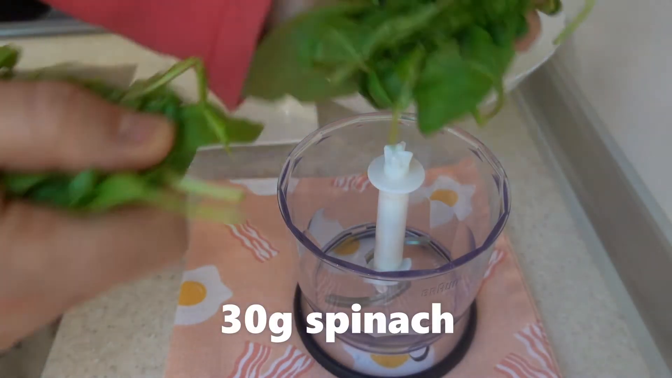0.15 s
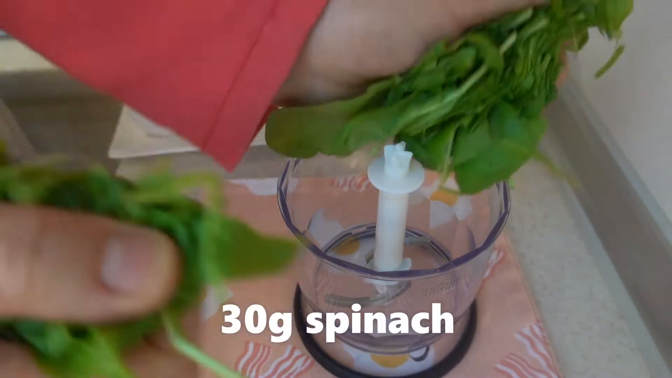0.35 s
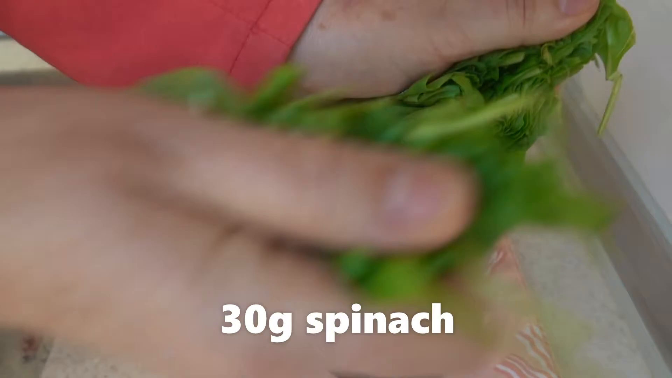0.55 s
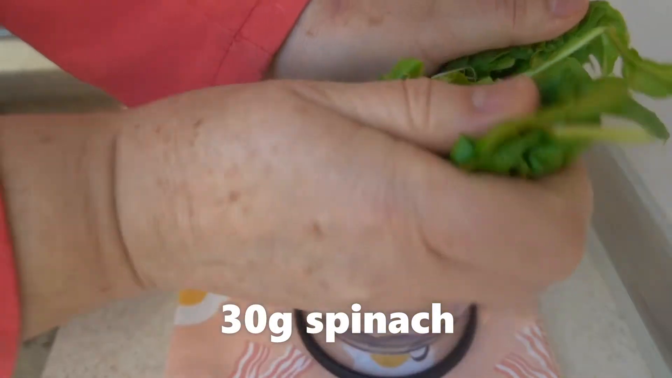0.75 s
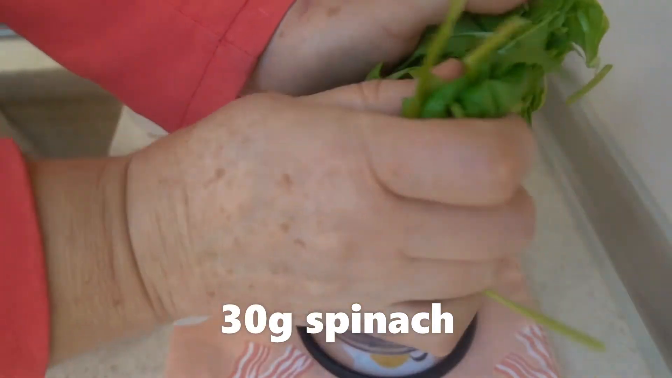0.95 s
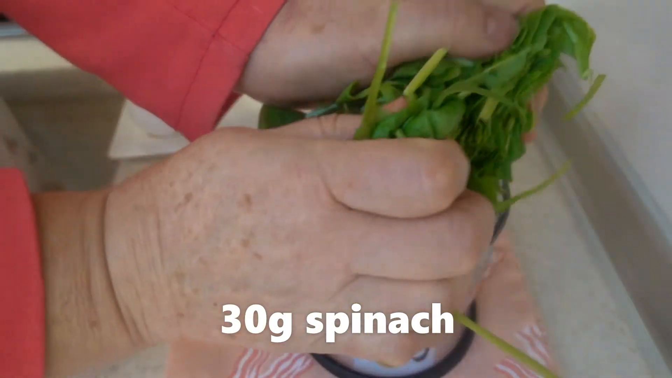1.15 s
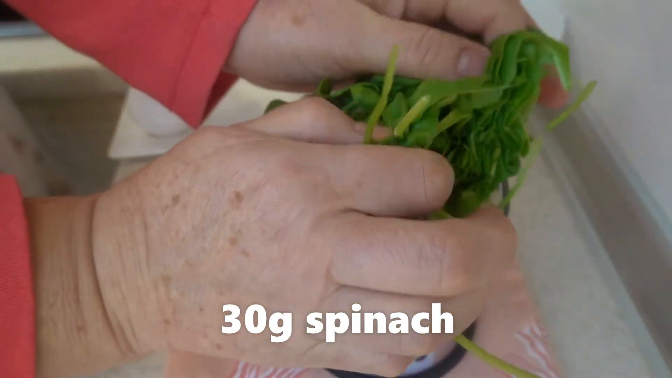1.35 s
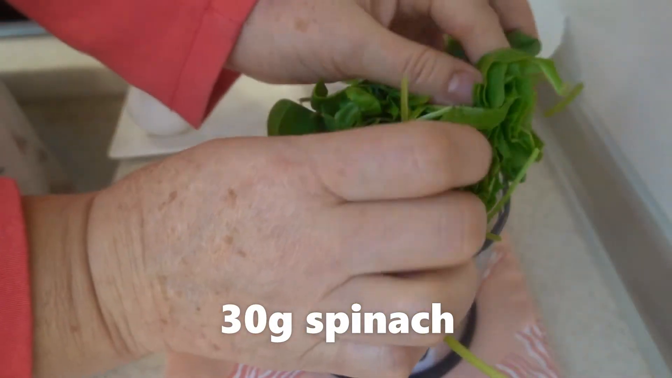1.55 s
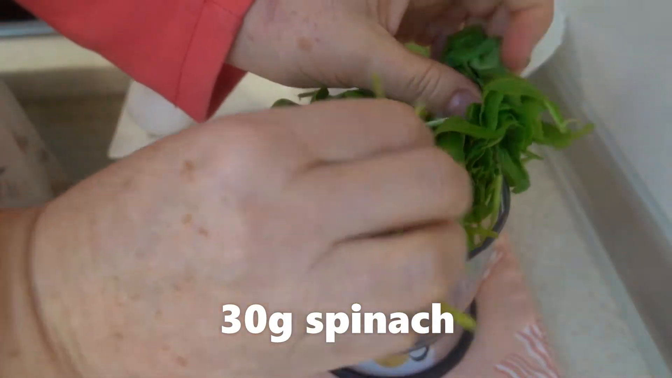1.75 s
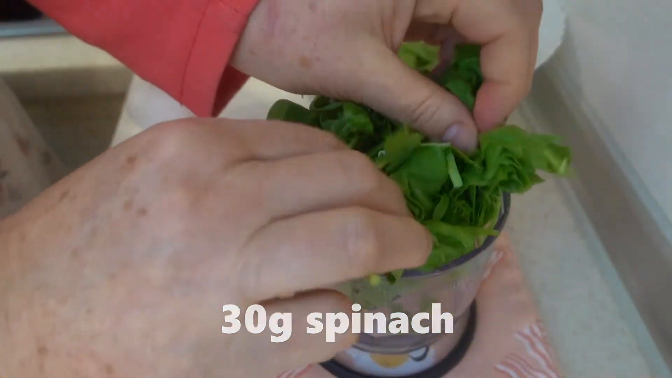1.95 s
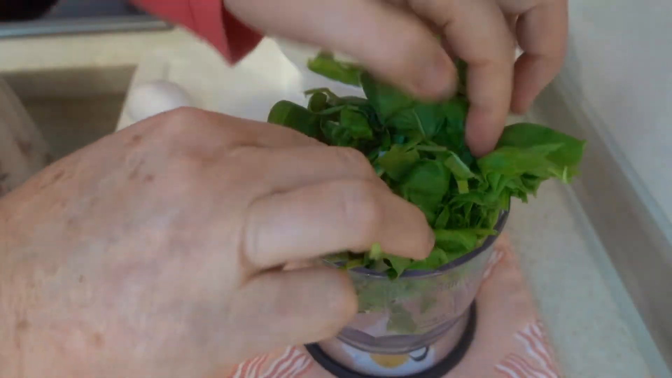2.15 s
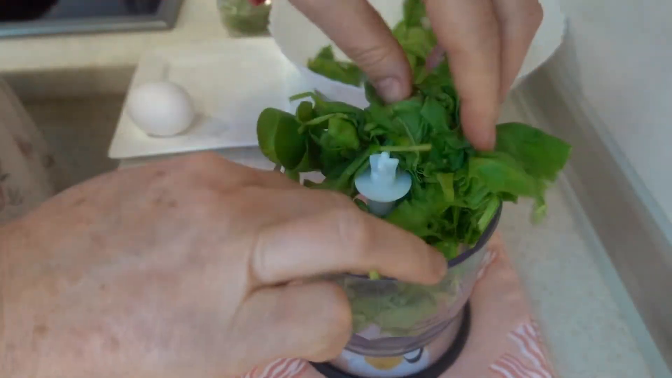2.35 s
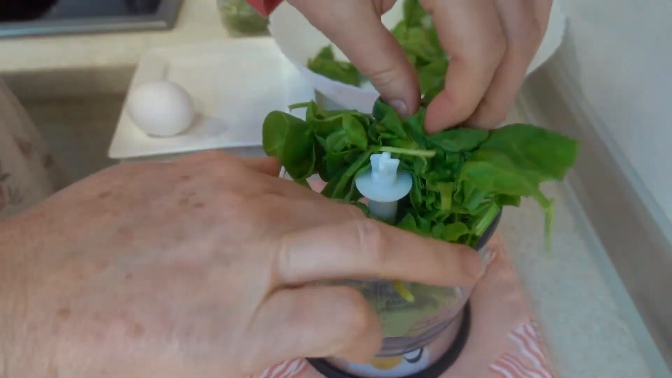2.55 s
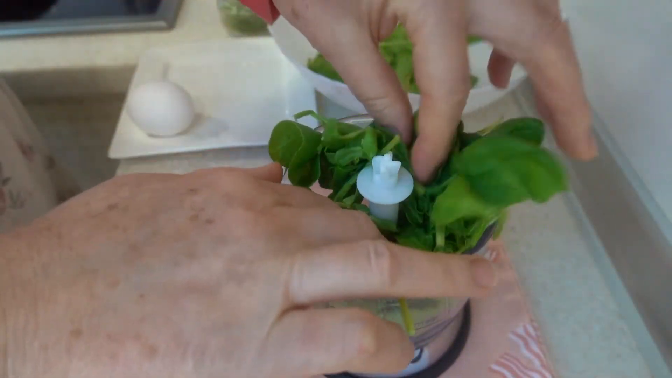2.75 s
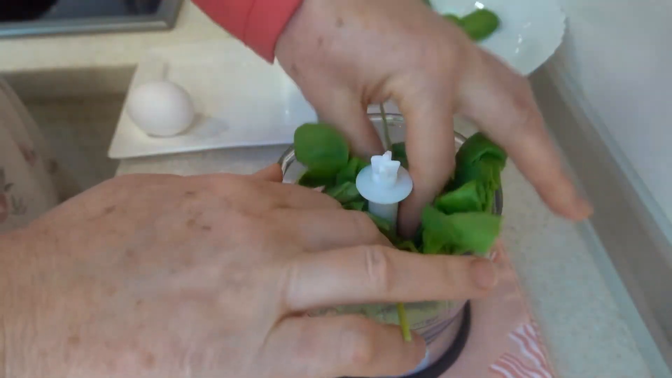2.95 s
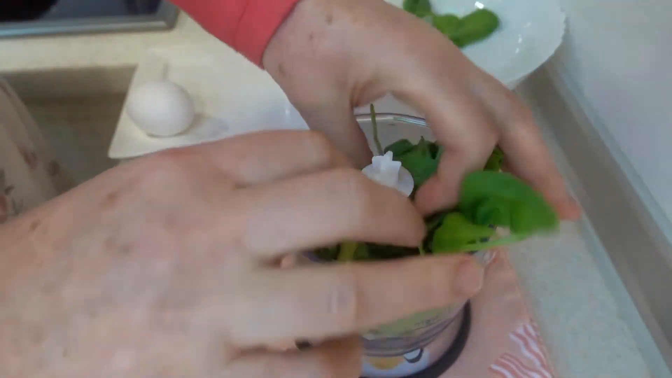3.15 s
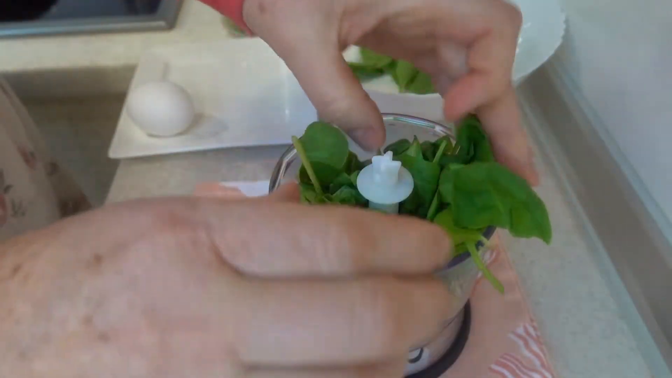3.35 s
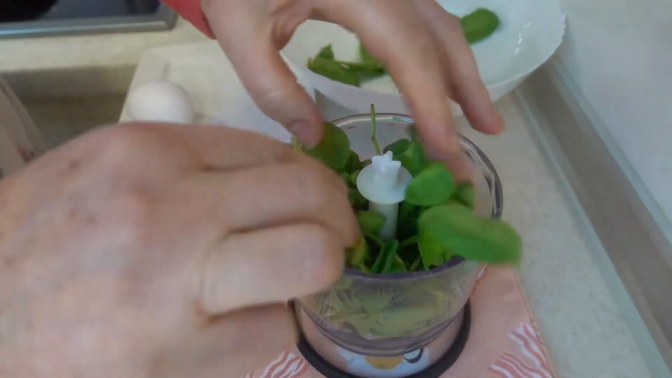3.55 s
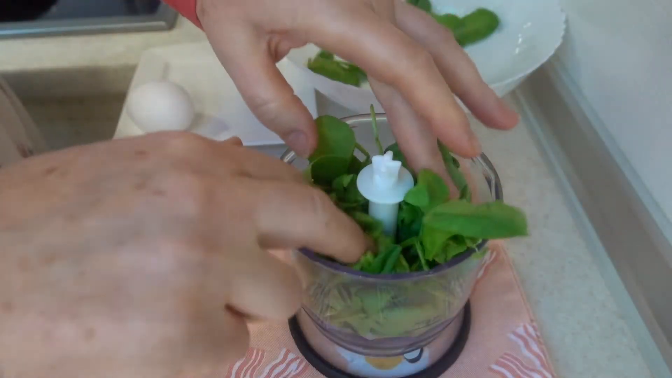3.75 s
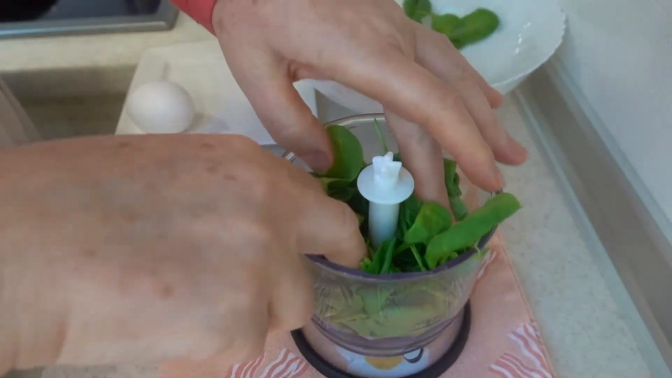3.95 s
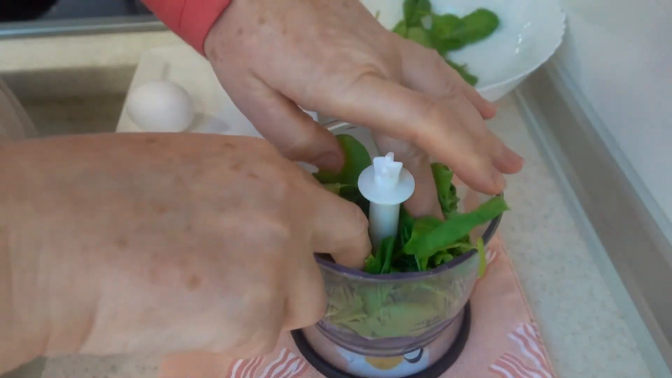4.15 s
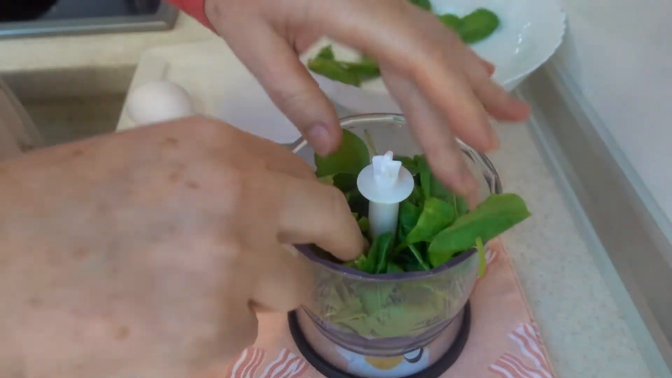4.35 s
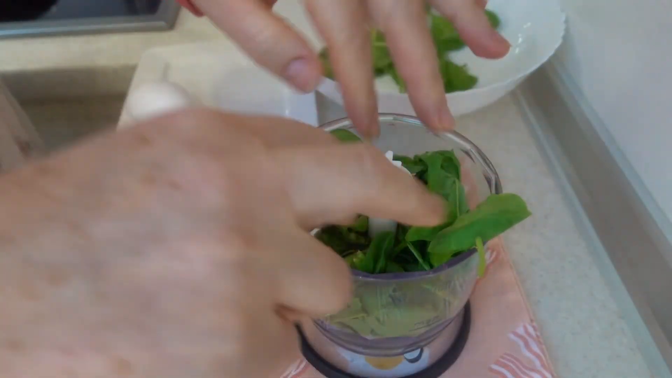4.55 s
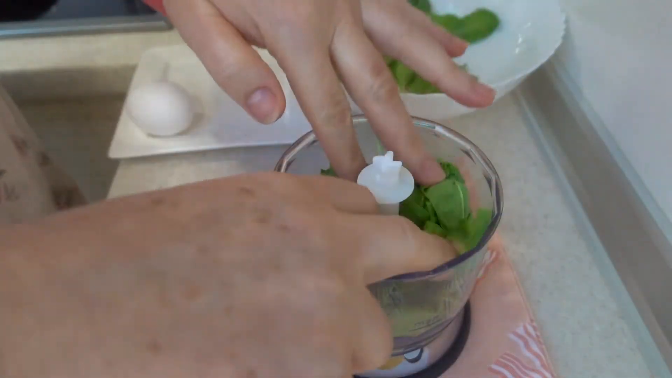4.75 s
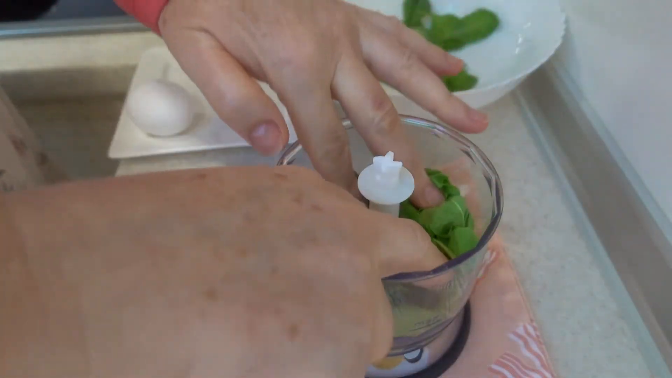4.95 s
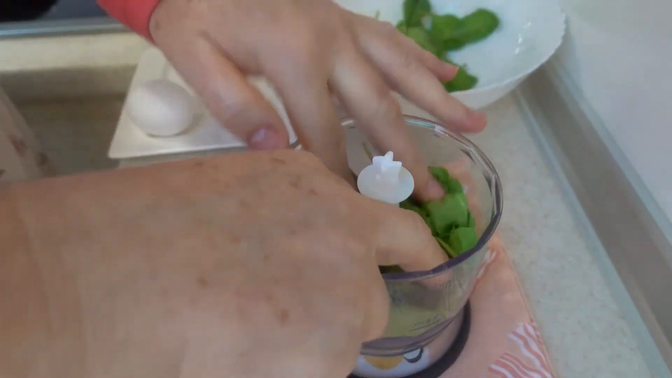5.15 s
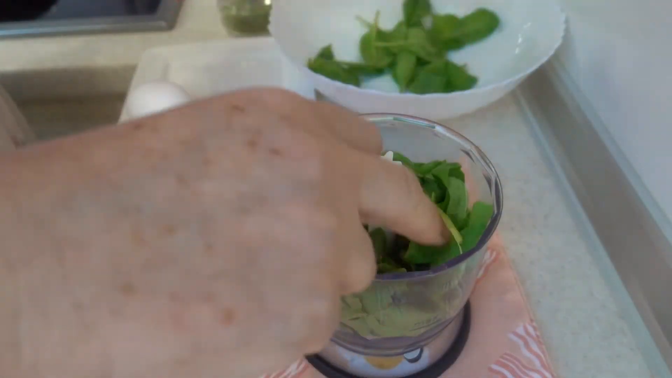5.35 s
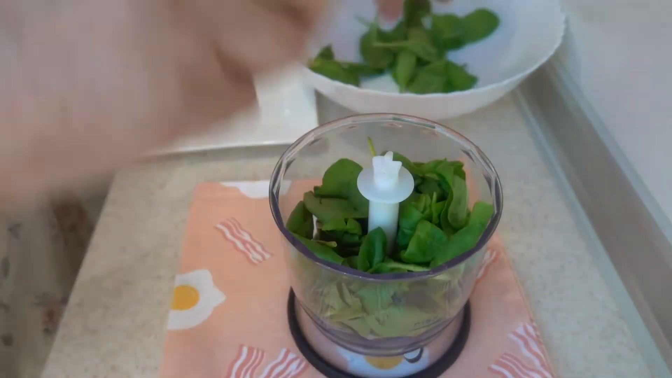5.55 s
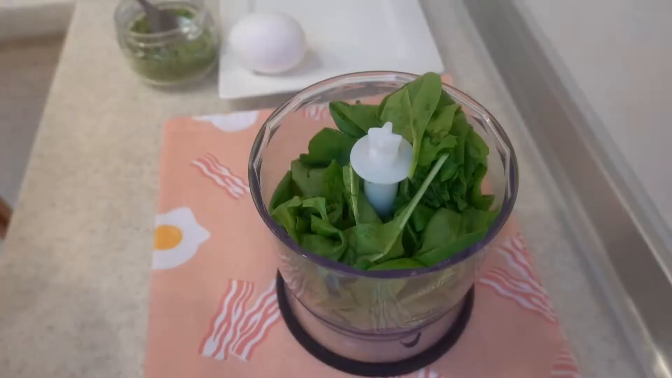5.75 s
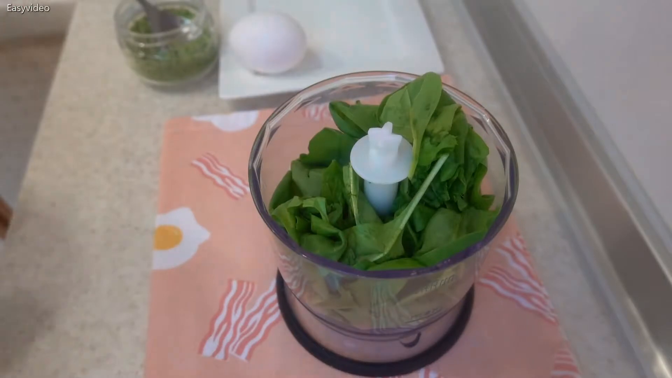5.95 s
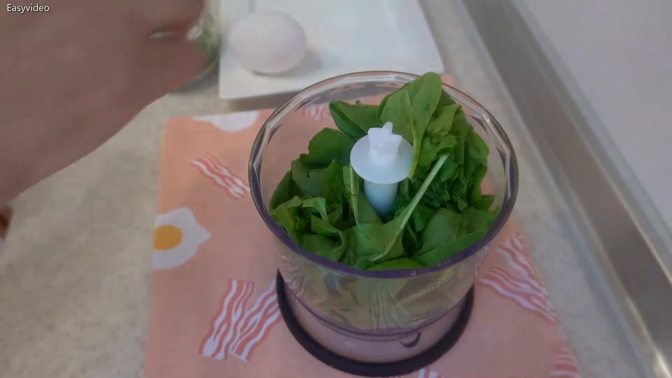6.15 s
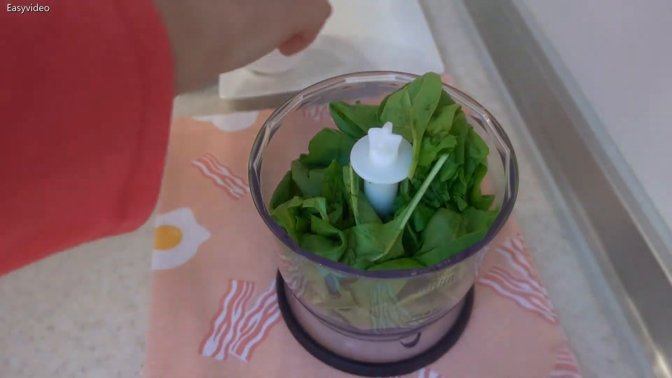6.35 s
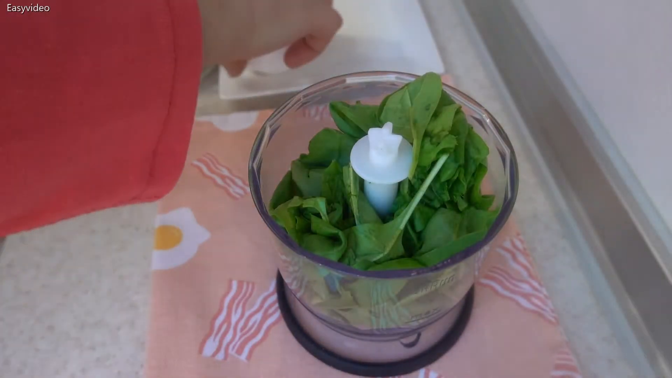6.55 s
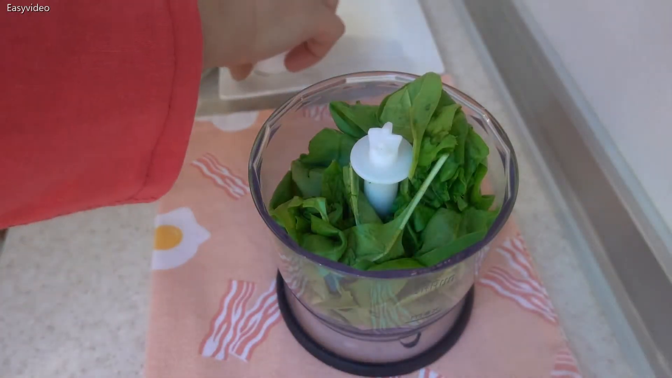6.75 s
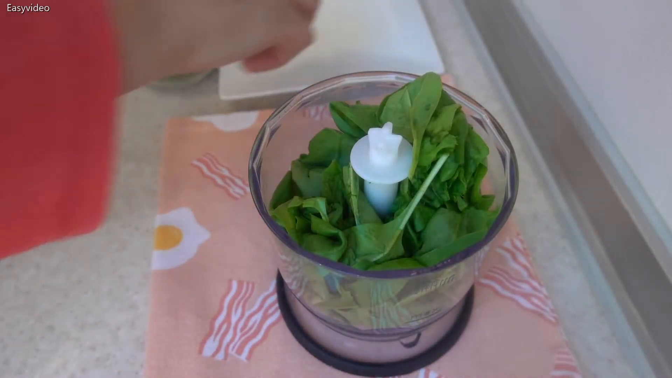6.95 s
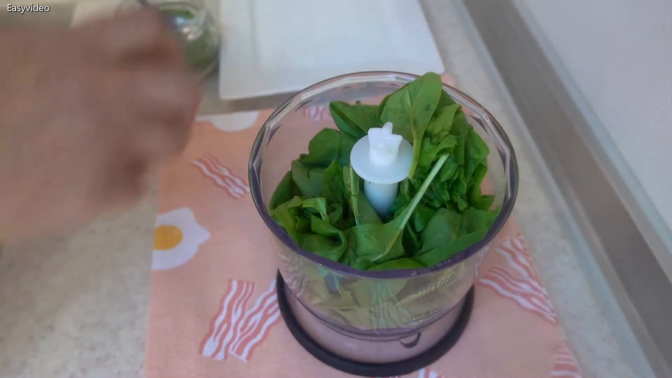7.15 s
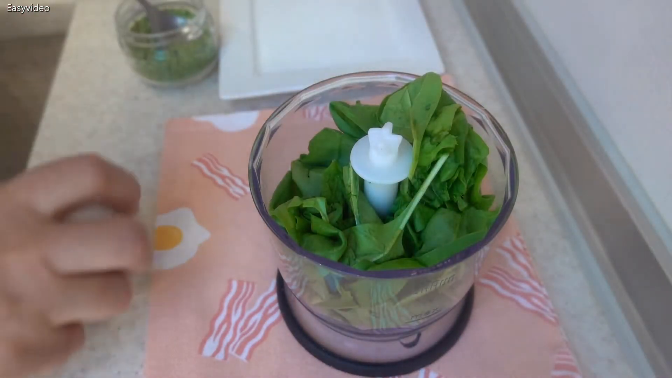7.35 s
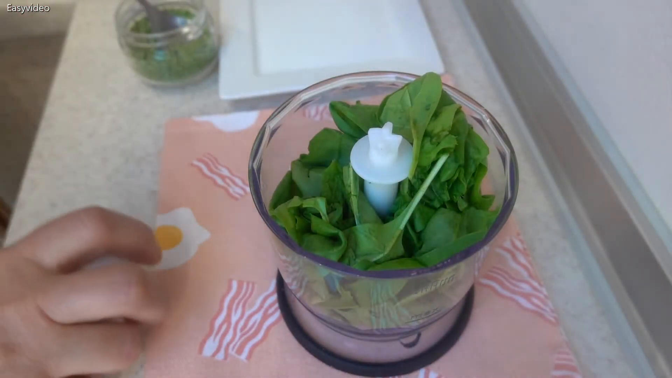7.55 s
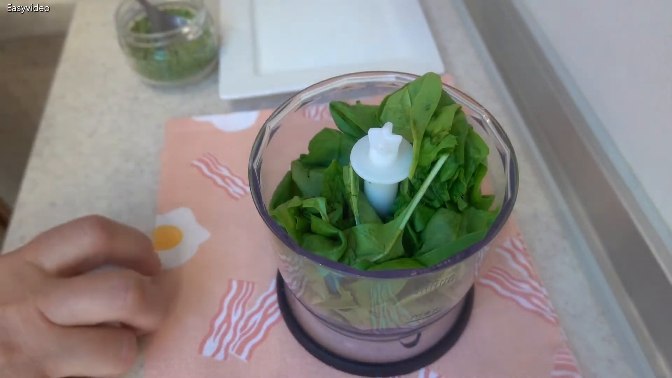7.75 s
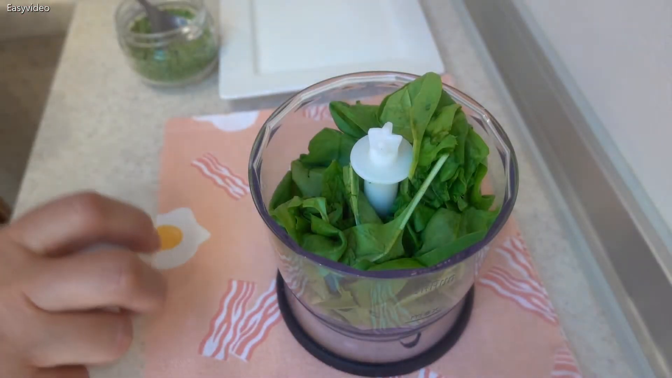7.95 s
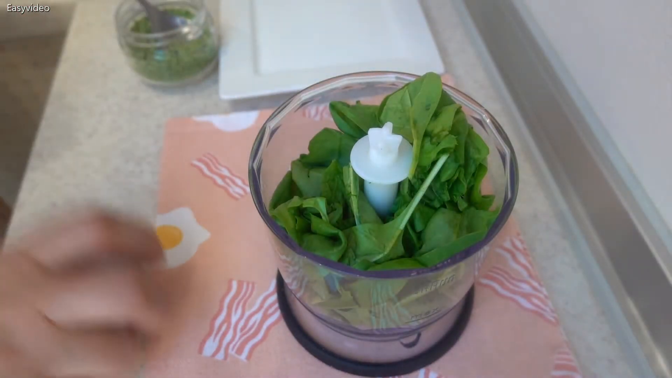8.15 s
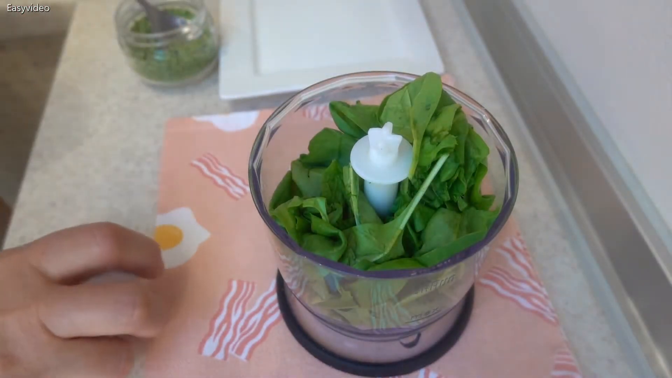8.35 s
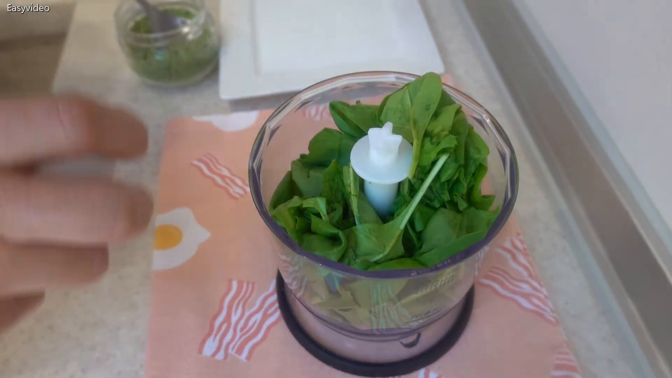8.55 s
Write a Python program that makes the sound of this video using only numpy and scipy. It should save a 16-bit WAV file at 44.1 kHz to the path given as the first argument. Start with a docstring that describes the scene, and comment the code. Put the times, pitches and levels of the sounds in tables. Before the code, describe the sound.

In a quiet kitchen, hands press fresh spinach into a plastic chopper bowl, heard up close. The leaves crinkle and squeak in uneven bursts, stems snap crisply and fingers bump the bowl. The bowl is jolted and a dish rings faintly. After a brief hush a sleeve swishes softly, then an egg is tapped once on the counter and cracked with a thud and a short crunch.

```python
"""Fresh spinach is pressed into the plastic bowl of a chopper on a kitchen counter. The leaves crinkle by many
tiny fractures, stems snap, and wet leaves squeak by stick-slip friction. Finger bumps excite the bowl's modes;
the bowl is jolted and a dish rings. Then the scene changes with a brief dip in level: a sleeve swishes as an
egg is taken from a plate, tapped once on the counter and cracked on it by brittle fracture of the shell. The
kitchen reverberates, and room tone with a faint low drone lies underneath."""
import sys
import numpy as np
from scipy import signal
from scipy.io import wavfile

SR = 44100
rng = np.random.default_rng(int(sys.argv[2]) if len(sys.argv) > 2 else 0)


def store_wav(level_fs):
    """Save 16-bit WAV to argv[1]."""
    pcm = np.round(np.clip(np.atleast_2d(level_fs), -1, 1) * 32767)
    wavfile.write(sys.argv[1], SR, pcm.T.astype(np.int16))


N = 379682
TIME = np.arange(N) / SR
SCENE_CHANGE_S, CRACK_S = 5.78, 8.1425
CUTOFF_HZ = 16200

# Levels are relative: each source applies its own overall gain.
# noise spectra: frequency_hz, density_db
ROOM_SPECTRUM = [(25, -1), (55, -2.5), (110, -1), (170, -5.5), (260, -5), (380, -23), (600, -17),
                 (850, -18.5), (1200, -23.5), (2000, -25.5), (4000, -27.5), (15500, -33)]
CLOTH_SPECTRUM = [(350, -7.5), (520, -12), (760, -9), (1250, -2), (2500, -3.5), (4500, -7.5), (8000, -16),
                  (15500, -13.5)]
CUFF_SPECTRUM = [(1200, -16), (3500, -8.5), (5500, -4), (8000, -2.5), (12000, -8), (15500, -6)]
CRUNCH_SPECTRUM = [(500, -18), (850, -11), (1100, -8.5), (1800, -0.5), (2500, -3.5), (3500, -6),
                   (5000, -9.5), (7500, -9.5), (11000, -17), (15500, -23.5)]
LEAF_SPECTRUM = [(300, -10), (900, -14.5), (1800, -7), (3000, -1), (4500, -2), (7000, -4.5), (11000, -5.5),
                 (15500, -11)]
# likeness of left and right: frequency_hz, correlation
COHERENCE = [(60, 1), (300, 0.91), (600, 0.85), (1200, 0.67), (2500, 0.66), (5000, 0.19), (14000, 0.31)]
# reflections from counter and wall: delay_ms, level_db
NEAR_ECHOES = [(1.12, -5.5), (2.5, -13), (3.7, -12)]
# a faint low drone coming and going: peak_s, length_s, pitch_hz, glide_hz_per_s, level_db
DRONE_SWELLS = [(1.65, 1.5, 174, 19.5, -53), (4.358, 0.86, 169, -6.5, -60.5), (5.601, 1.14, 176, 8, -60),
                (7.949, 0.93, 214.7, -8.5, -59)]

# modes of struck bodies: pitch_hz, level_db, t60_s
PLATE_MODES = [(128, -17, 0.16), (242.2, -4.5, 0.068), (340, -2.5, 0.06), (701, -4.5, 0.11),
               (1040, -13, 0.17), (2030, -8, 0.16), (2710, -6, .06)]
COUNTER_MODES = [(71, -29.5, 0.52), (123.7, -12, 0.23), (154, -24, 0.33), (200, -15, 0.2),
                 (235.7, -14, .19), (273, -16.5, 0.27), (257.7, -15, 0.2), (298, -5, 0.049),
                 (446, -25, 0.35), (726, -16, 0.13), (1290, -16, 0.016), (1900, -16, 0.055)]
DISH_MODES = [(1375, -4.5, 1), (2063, -6.5, 0.77), (2880, -3, 0.64), (3775, 0, 0.15), (4780, -5, .1),
              (7070, -7, 0.11)]
BOWL_MODES = [(128.7, -15.5, 0.2), (201, -18.5, 0.26), (289, -5.5, 0.054), (345, -16, 0.11),
              (399.7, -21.5, 0.11), (495, -13, 0.059), (686, -10, 0.024), (1049, -4, 0.07),
              (1193, -9, 0.049), (1410, -2, 0.027), (1616, 0.5, 0.03), (2144, 2, 0.031), (2900, -9, .03)]
CAVITY_MODES = [(207, -9.5, 0.061), (586, 3.5, 0.089), (620, -16, .12)]
# impacts: start_s, level_db, contact_ms
PLATE_NUDGES = [(6.366, -41.5, 2.9), (6.572, -43.5, 1.3), (6.598, -38.5, 1.6), (6.706, -33, 1.3)]  # the egg nudging its plate
COUNTER_KNOCKS = [(7.5958, -17.5, 1.9), (7.599, -16, 0.97), (7.603, -20.5, 3), (8.144, -22, 3.6),
                  (8.157, -17.5, 3.1), (8.171, -8, 4.05), (8.197, -10, 5.7)]  # egg and hand striking the counter
DISH_CLINKS = [(5.608, -42, 0.17), (5.626, -34, 0.14)]
FINGER_BUMPS = [(1.057, -29, 1.4), (1.841, -29.5, 1.1), (1.885, -24, 2.6), (2.224, -32.5, 0.98),
                (2.292, -27.5, 0.94), (2.483, -29, 1.2), (2.608, -27.5, 1.2), (2.755, -32, 1),
                (2.895, -30.5, .5), (3.856, -25.5, 0.76), (4.040, -33, 0.22), (4.831, -22.5, 0.51),
                (4.932, -31.5, 0.38), (5.577, -24, 2.6), (5.610, -24.5, 0.28), (5.617, -27, 1.3),
                (5.638, -22, 0.38)]
CAVITY_POPS = [(1.889, -23, 1.7), (2.295, -32.5, .6), (2.795, -36.5, 0.59), (2.898, -32.5, 0.75)]  # hollow pops of the bowl
# resonances driven by noise: pitch_hz, width_hz, level_db
NOOK_PEAKS = [(720, 64, 1.5), (1236, 100, -3), (159, 124, -1)]  # the nook between counter and wall
SHELL_PEAKS = [(1694, 40, 6.5), (1770, 60, 3.5), (1900, 110, 1), (2070, 140, -1), (2460, 230, -7.5),
               (1270, 120, -8), (870, 37, -6.5)]  # the breaking eggshell
SHUDDER_PEAKS = [(116, 22, -9), (200, 17, -8.5), (236.6, 21, -5), (273, 20, -3), (446, 45, -15)]  # the counter under the crushed shell
RUBBED_BOWL_PEAKS = [(177, 110, -0.5), (330, 186, -2.5), (660, 118, 3.5), (1048, 52, 1), (1368, 160, -2.5),
                     (1680, 95, -0.5), (2060, 350, 0), (2880, 500, -6), (3605, 160, .5)]
# swells of grainy noise: peak_s, length_s, pitch_hz, width_hz, level_db
RUMBLE = [(.03, .45, 50, 50.5, -53)]  # a soft rumble at the outset
SHELL_CHAFES = [(7.116, 0.067, 5400, 500, -59.5), (7.182, 0.045, 5360, 500, -53),
                (7.265, .03, 5300, 400, -59.5), (7.41, 0.031, 5350, 398, -65),
                (7.456, 0.02, 5240, 400, -67)]  # fingertips on the egg
FOOT_JUDDER = [(5.625, .05, 335, 80, -32.5), (5.64, .06, 240, 40, -38), (5.68, .07, 395, 90, -47)]  # the bowl's foot on the counter
LEAF_SQUEAKS = [(.80, 0.076, 9400, 400, -51), (.87, 0.18, 5430, 300, -49.5), (.90, .14, 6200, 300, -49.5),
                (.94, .14, 3700, 300, -47.5), (.92, .08, 9400, 400, -52), (2.265, 0.072, 2950, 1800, -36.5),
                (4.26, 0.069, 3600, 2500, -45.5), (4.873, .02, 3100, 2200, -35.5),
                (5.123, 0.044, 4240, 3000, -41.5), (5.26, 0.075, 11700, 350, -51)]  # wet leaves sliding

# the arm reaching out and drawing back: peak_s, length_s, sleeve_db, cuff_db
ARM_SWEEPS = [(5.93, 0.18, -58, -76), (6.19, 0.43, -53, -64), (6.953, 0.21, -63, -59.5),
              (7.127, 0.23, -61.5, -57.5), (7.39, 0.39, -78, -63.5)]
# steady rustle of the held leaves: time_s, level_db
GRIP = [(0.0, -45.5), (0.25, -53), (1.37, -42), (1.85, -47), (2.78, -38), (3.01, -40.5), (3.2, -59),
        (3.47, -60.5), (3.88, -44), (4.11, -46), (4.35, -63.5), (4.64, -64.5), (4.81, -47), (5.04, -57),
        (5.26, -64.5), (5.63, -51.5), (5.74, -63)]
# fingers crushing leaves: start_s, hold_s, level_db, tilt_db_per_octave, relative_rubbing_db
PUSHES = [(0.303, 0.043, -40, -2, -28), (0.384, 0.13, -45.5, -2, -7), (0.546, 0.062, -45, -1.5, -6.5),
          (0.728, 0.067, -46, -1, -10), (0.918, 0.037, -42.5, 1, -10), (1.077, 0.036, -37, 0, -10),
          (1.20, .13, -42, -1.5, -13), (1.374, 0.051, -38.5, 3.5, -2.5), (1.78, .06, -45.5, -0.5, -0.5),
          (1.93, 0.074, -42.5, -0.5, -11.5), (2.028, 0.043, -41, 10, -13), (2.204, 0.098, -35.5, 0, -8),
          (2.274, 0.026, -30.5, -3.5, -10), (2.464, .03, -40, 4, -11), (2.55, .08, -38.5, 3, -10),
          (2.739, 0.06, -32, 0, -6), (2.873, 0.078, -38.5, -4, -4.5), (3.087, 0.067, -38, 2.5, -11.5),
          (3.435, 0.019, -43.5, 2.5, -31), (3.518, 0.04, -46.5, 3.5, -13), (3.658, 0.023, -41.5, -2, -6),
          (3.708, 0.068, -41.5, 3, -8), (3.874, 0.13, -45.5, -8, -3.5), (4.024, 0.037, -33.5, -7, -12.5),
          (4.21, 0.064, -42, -2, -7.5), (4.627, 0.1, -47.5, 2, -10.5), (4.846, 0.068, -40, 0.5, -3.5),
          (4.912, 0.064, -40.5, 2, 2), (4.994, 0.0099, -39, 7, -18), (5.092, 0.056, -42, -1, -7),
          (5.165, 0.095, -49.5, 1.5, -5.5), (5.56, 0.26, -49, 2, -8)]
# stems and leaf ribs breaking: start_s, level_db, pitch_hz, tear_ms
STEM_SNAPS = [(0.1055, -22.5, 8550, 5.3), (0.3293, -24.5, 4730, 4.5), (0.411, -25.5, 3600, 5.2),
              (0.5774, -27, 2860, 4), (1.2426, -21, 4840, 4.9), (1.4003, -12, 4420, 3.1),
              (1.498, -21.5, 4650, 4), (1.6774, -24, 3630, 7.1), (1.7885, -17, 3750, 4),
              (2.0348, -21.5, 11000, 3), (2.0564, -22, 12610, 4), (2.1267, -19.5, 11900, 3),
              (2.2942, -14, 9190, 3.6), (2.4501, -14.5, 2530, 4.4), (2.531, -20, 4500, 4),
              (2.5691, -15, 11300, 4.4), (2.644, -6.5, 12200, 3), (2.7696, -13.5, 3560, 4),
              (2.894, -18, 3654, 4.4), (2.9422, -21, 3300, 4.4), (3.5263, -28, 4400, 4.9),
              (3.6726, -23.5, 5130, 4), (3.7215, -14, 3540, 5), (3.7504, -16, 6350, 4),
              (4.041, -18.5, 2880, 3.7), (4.115, -22, 4780, 4), (4.5334, -40, 12400, 4),
              (4.9322, -21.5, 2660, 3.2), (4.9604, -19.5, 5320, 4.1), (5.029, -23, 3670, 4),
              (5.1864, -22, 11300, 4)]


def from_db(db):
    """Amplitude ratio of a level in decibels."""
    return 10 ** (np.asarray(db) / 20)


def rms_one(x):
    """Normalisation to unit mean power."""
    return x / np.sqrt(np.mean(x ** 2) + 1e-20)


def at_hz(points, hz):
    """Interpolation on a logarithmic frequency axis."""
    frequencies, values = np.transpose(points)
    return np.interp(np.log(hz), np.log(frequencies), values)


def drift(rate_hz):
    """Random modulation of unit rms, interpolated between Gaussian draws."""
    knots = rng.standard_normal(int(N / SR * rate_hz) + 2)
    return rms_one(np.interp(TIME * rate_hz, np.arange(len(knots)), knots))


def swell(peak_s, length_s):
    """Gaussian envelope, length_s wide at 1/e of its peak."""
    return np.exp(-np.minimum((2 * (TIME - peak_s) / length_s) ** 2, 50))


def stereo(pair, hz):
    """Partial coherence: two independent signals, as mid and side, are less alike in the treble."""
    alike = np.clip(at_hz(COHERENCE, hz), 0, 1)
    return np.sqrt((1 + alike) / 2) * pair[0] + np.sqrt((1 - alike) / 2) * pair[1] * [[1], [-1]]


def bandpass(x, low_hz, high_hz):
    """Butterworth band-pass filter."""
    return signal.sosfilt(signal.butter(2, [low_hz, high_hz], "band", fs=SR, output="sos"), x)


def resonance(x, hz, width_hz):
    """Damped two-pole oscillator with unit gain at its peak."""
    r = np.exp(-np.pi * width_hz / SR)
    feedback = [1, -2 * r * np.cos(2 * np.pi * hz / SR), r * r]
    return signal.lfilter(np.array([1, 0, -1]) * (1 - r * r) / 2, feedback, x + 1e-18)


def shaped_noise(force, spectrum, flicker_db=0, tilt_db_per_octave=0):
    """Source and filter: force-modulated noise is weighted in half-octave bands."""
    edges = 23 * 2 ** np.arange(0, 9.6, .5)
    drive = rng.standard_normal((2, 2, N)) * force + 1e-18
    out, power = 0, 0
    for k, (low, high) in enumerate(zip(edges, edges[1:])):
        if high < spectrum[0][0]:
            continue
        hz = np.sqrt(low * high)
        octaves = np.log2(np.clip(hz, 2000, 13000) / 5000)
        gain = from_db(at_hz(spectrum, hz) + tilt_db_per_octave * octaves)
        band = bandpass(stereo(drive[k % 2], hz), low, high)
        out += gain * band * (from_db(flicker_db * drift(220)) if flicker_db else 1)
        power += gain ** 2 * (high - low) / (SR / 2)
    return out / np.sqrt(power)


def resonant_noise(force, peaks):
    """Forced vibration: force-modulated noise drives parallel resonances of alternating sign."""
    drive = rng.standard_normal((2, N)) * force
    out, power = 0, 0
    for k, (hz, width, db) in enumerate(peaks):
        out += (-1) ** k * from_db(db) * resonance(stereo(drive, hz), hz, width)
        power += from_db(db) ** 2 * np.pi * width / SR
    return out / np.sqrt(power)


def grains(per_s, spread_db, grain_ms, smooth_share):
    """Shot noise: a force of unit rms, made of tiny random fractures over smooth friction."""
    sizes = from_db(spread_db * np.minimum(rng.exponential(1, N), 3))
    impulses = sizes * (rng.random(N) < per_s / SR)
    decay = np.exp(-2000 / (grain_ms * SR))
    energy = signal.lfilter([1], [1, -decay], impulses ** 2 + 1e-18)
    return np.sqrt((1 - smooth_share) * energy / energy.mean() + smooth_share)


def grainy_swells(rows):
    """Irregular pulses drive one resonance per swell, as in stick-slip friction."""
    out = np.zeros((2, N))
    slips = grains(per_s=900, spread_db=4, grain_ms=0.64, smooth_share=0.45)
    for s, length, hz, width, db in rows:
        near = np.abs(TIME - s) < 2 * length
        drive = stereo(rng.standard_normal((2, near.sum())), hz) * slips[near]
        out[:, near] += from_db(db) * rms_one(resonance(drive, hz, width)) * swell(s, length)[near]
    return out


def struck(impacts, modes):
    """Modal ringing after impact: the longer the contact, the weaker the high modes."""
    force, out = np.zeros(N), np.zeros((2, N))
    for s, db, contact_ms in impacts:
        contact_age = np.arange(SR // 50) / (contact_ms * SR / 1000)
        pulse = contact_age * np.exp(-2 * np.pi * contact_age)
        start = round(s * SR)
        force[start:start + len(pulse)] += from_db(db) * pulse / pulse.sum()
    for hz, db, t60 in modes:
        width = np.log(1000) / (np.pi * t60)
        out += from_db(db) * resonance(force, hz, width) * SR / (2 * np.pi * width)
    return out


def drone(width_hz=12):
    """Narrow-band noise: random modulation of a gliding tone gives a wavering hum."""
    out, waver = 0, drift(width_hz) + 1j * drift(width_hz)
    for s, length, hz, glide, db in DRONE_SWELLS:
        phase = 2 * np.pi * np.cumsum(hz + glide * (TIME - s)) / SR
        out += from_db(db) * swell(s, length) * np.real(waver * np.exp(1j * phase))
    return out


def room_tone():
    """Ambient noise: a steady floor with three resonances, the drone and an opening rumble."""
    floor = from_db(-56.5) * shaped_noise(1, ROOM_SPECTRUM)
    hum = from_db(-65.5) * resonant_noise(1, [(120, 20, 5), (257, 60, -2.5), (850, 99, -6)])
    return floor + hum + from_db(-1) * drone() + grainy_swells(RUMBLE)


def reverberate(x, wet_db, t60_s, treble_t60_s):
    """Diffuse reverberation: an exponential tail that dies faster in the treble."""
    t, tail = TIME[:SR // 2], 0
    edges = np.geomspace(60, 16000, 9)
    for low, high in zip(edges, edges[1:]):
        hz = np.sqrt(low * high)
        noise = bandpass(stereo(rng.standard_normal((2, len(t))), hz), low, high)
        band_t60_s = at_hz([(1500, t60_s), (12000, treble_t60_s)], hz)
        tail += noise * from_db(-60 * t / band_t60_s)
    onset = np.clip(t / 0.004 - .5, 0, 1)
    response = rms_one(tail * onset) / np.sqrt(len(t))
    return x + from_db(wet_db) * signal.fftconvolve(x, response, axes=1)[:, :N]


def near_echoes(x, wander=.08):
    """Early reflections from hard surfaces; their delays wander as the leaves move."""
    out, power = x, 1
    for ms, db in NEAR_ECHOES:
        emitted_s = TIME - ms / 1000 * (1 + wander * drift(30))
        index = np.clip(np.round(emitted_s * SR).astype(int), 0, N - 1)
        out = out + from_db(db) * x[:, index]
        power += from_db(db) ** 2
    return out / np.sqrt(power)


def sleeve(chafe_hiss_db=5):
    """Friction noise: cloth swishes smoothly, while cuff and fingertips brush with a fine grain."""
    swish_power = sum((from_db(db) * swell(s, length)) ** 2 for s, length, db, _ in ARM_SWEEPS)
    brush_power = sum((from_db(db) * swell(s, length)) ** 2 for s, length, _, db in ARM_SWEEPS)
    for s, length, _, _, db in SHELL_CHAFES:
        brush_power += (from_db(db + chafe_hiss_db) * swell(s, length)) ** 2
    texture = grains(per_s=980, spread_db=3, grain_ms=1.566, smooth_share=.6)
    brush = shaped_noise(np.sqrt(brush_power) * texture, CUFF_SPECTRUM)
    cloth = shaped_noise(np.sqrt(swish_power), CLOTH_SPECTRUM)
    nook = resonant_noise(np.sqrt(swish_power), NOOK_PEAKS)
    return from_db(1) * cloth + from_db(-4.5) * nook + from_db(-1.2) * brush


def shell_tick(start_s=7.5975, level_db=-36, decay_s=.007):
    """Heavily damped resonances give the unbroken shell a dry tick when it is tapped."""
    age = np.maximum(TIME - start_s, 0)
    tap = (age > 0) * np.exp(-age / decay_s)
    peaks = [(650, 270, -10), (1800, 540, 1.5), (3050, 760, 1.5), (4540, 2800, -8.5)]
    return from_db(level_db) * resonant_noise(tap, peaks)


def shell_crack(crush_s=0.071, fade_db_per_s=250):
    """Brittle fracture: the shell breaks, then caves in with a run of cracks that shake the counter."""
    age = np.maximum(TIME - CRACK_S, 0)
    crush = (age > 0) * from_db(-fade_db_per_s * np.maximum(age - crush_s, 0))
    first_break = 1 + 0.74 * np.exp(-age / 0.012)
    force = crush * first_break * grains(per_s=2500, spread_db=1.8, grain_ms=.6, smooth_share=.3)
    crunch = from_db(-28) * shaped_noise(force, CRUNCH_SPECTRUM)
    ring = from_db(-27) * resonant_noise(force, SHELL_PEAKS)
    shudder = from_db(-29) * resonant_noise(force, SHUDDER_PEAKS)
    return crunch + ring + shudder


def bowl():
    """Dispersion of bending waves smears each bump on the thin wall; the cavity rings with hollow pops."""
    wall = struck(FINGER_BUMPS, BOWL_MODES)
    for hz, width_hz in [(900, 840), (1900, 1500)]:
        wall = wall - 2 * resonance(wall, hz, width_hz)  # all-pass: shifts only the phase
    return wall + struck(CAVITY_POPS, CAVITY_MODES)


def handling(attack_s=0.012, release_db_per_s=380, grip_rubbing_db=-7.5):
    """Incoherent sources add in power: grip and pushes set the rustle, its tilt and the rubbing."""
    grip_db = np.interp(TIME, *np.transpose(GRIP))
    rustle_power = from_db(grip_db + 0.5) ** 2
    rubbing_power = rustle_power * from_db(grip_rubbing_db) ** 2
    weighted_tilt = np.zeros(N)
    for s, hold, db, tilt, rubbing_db in PUSHES:
        near = (TIME > s) & (TIME < s + hold + .5)
        age = TIME[near] - s
        attack = np.minimum(age / attack_s, 1)
        power = (attack * from_db(db - release_db_per_s * np.maximum(age - hold, 0))) ** 2
        rustle_power[near] += power
        weighted_tilt[near] += power * tilt
        rubbing_power[near] += power * from_db(rubbing_db) ** 2
    return np.sqrt(rustle_power), weighted_tilt / rustle_power, np.sqrt(rubbing_power)


def vein_snaps(rustle, per_s=9, boost_db=11, spread_db=3, centre_hz=4970, tear_ms=3):
    """A random point process: small veins snap in proportion to the rustle; rows as in STEM_SNAPS."""
    rows = []
    for when, size, pitch in rng.random((int(per_s * SCENE_CHANGE_S), 3)):
        s = when * SCENE_CHANGE_S
        db = 20 * np.log10(rustle[int(s * SR)]) + boost_db + spread_db * (2 * size - 1)
        rows.append((s, db, centre_hz * 2 ** (pitch - .5), tear_ms))
    return rows


def stems(snaps, rise_ms=.2, crack_ms=0.28, tear_db=-11, broadband_db=-8, gain_db=-9):
    """Sudden release of stress: a stem gives with a sharp crack and a short tearing."""
    out, ms = np.zeros((2, N)), TIME[:SR // 20] * 1000
    for s, db, hz, tear_ms in snaps:
        rise = 1 - np.exp(-ms / rise_ms)
        decay = np.exp(-ms / crack_ms) + from_db(tear_db) * np.exp(-ms / tear_ms)
        noise = stereo(rng.standard_normal((2, len(ms))), hz) * rise * decay
        ring = resonance(noise, hz, width_hz=np.clip(0.31 * hz, 2500, 7000))
        snap = bandpass(ring + from_db(broadband_db) * noise, 1500, CUTOFF_HZ)
        onset_rms = snap[:, :SR // 400].std(axis=1, keepdims=True)
        start = round(s * SR)
        out[:, start:start + len(ms)] += from_db(db) * snap / onset_rms
    return from_db(gain_db) * near_echoes(out)


def leaves(rustle, tilt, rubbing):
    """Crackling noise: leaves crinkle in clumps, and their friction drives the bowl's resonances."""
    clumps = rms_one(from_db(1.9 * drift(90)))
    fractures = grains(per_s=490, spread_db=3.5, grain_ms=1, smooth_share=0.56)
    crackle = shaped_noise(rustle * clumps * fractures, LEAF_SPECTRUM,
                           flicker_db=2, tilt_db_per_octave=tilt)
    slips = grains(per_s=400, spread_db=3, grain_ms=0.88, smooth_share=0.34)
    scrub = resonant_noise(rubbing * clumps * slips, RUBBED_BOWL_PEAKS)
    return from_db(-0.57) * near_echoes(crackle) + from_db(1.4) * scrub


def scene():
    """Superposition: packing the bowl, a brief dip as the scene changes, then the egg, with room tone under
    both."""
    rustle, tilt, rubbing = handling()
    spinach = leaves(rustle, tilt, rubbing) + stems(list(STEM_SNAPS) + vein_snaps(rustle))
    spinach += grainy_swells(LEAF_SQUEAKS)
    packing = spinach + grainy_swells(FOOT_JUDDER) + bowl() + struck(DISH_CLINKS, DISH_MODES)
    packing = reverberate(packing, wet_db=-12.5, t60_s=0.58, treble_t60_s=0.3)
    packing *= from_db([[-.3], [.3]])  # slightly right
    fetching = sleeve() + grainy_swells(SHELL_CHAFES) + struck(PLATE_NUDGES, PLATE_MODES)
    fetching *= from_db([[.7], [-.7]])  # slightly left
    egg = fetching + struck(COUNTER_KNOCKS, COUNTER_MODES) + shell_tick() + shell_crack()
    egg = reverberate(egg, wet_db=-13, t60_s=0.68, treble_t60_s=0.46)
    # the whole level dips for an instant, and the ringing of bowl and dish ends there
    dip = np.clip(np.abs(TIME - SCENE_CHANGE_S) / 0.028, .25, 1) ** 2
    return dip * (packing * (TIME < SCENE_CHANGE_S) + egg + room_tone())


def record(dry):
    """Band limiting: the microphone thins the deep bass, and the top is cut steeply."""
    thinned = signal.sosfilt(signal.butter(2, 35, "high", fs=SR, output="sos"), dry)
    return signal.sosfilt(signal.ellip(10, .1, 70, CUTOFF_HZ, fs=SR, output="sos"), thinned)


dry = scene()
out = record(dry)
store_wav(out)
```